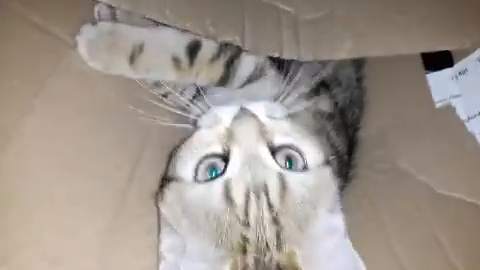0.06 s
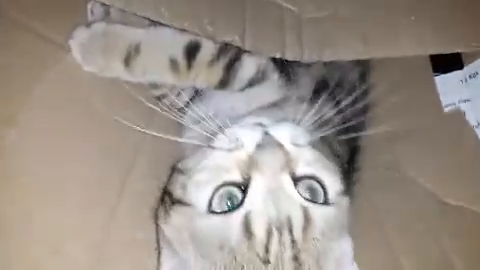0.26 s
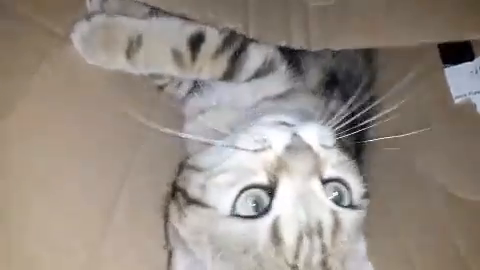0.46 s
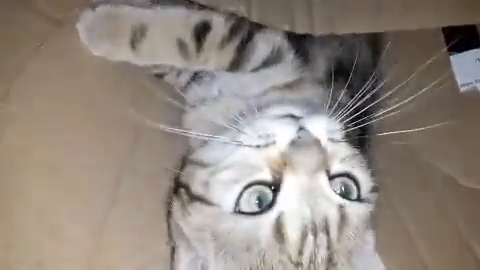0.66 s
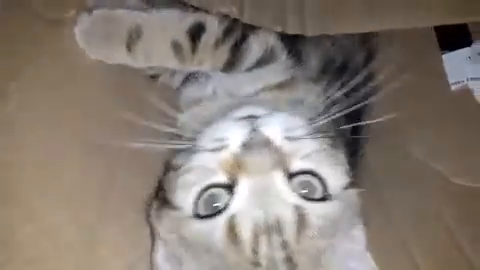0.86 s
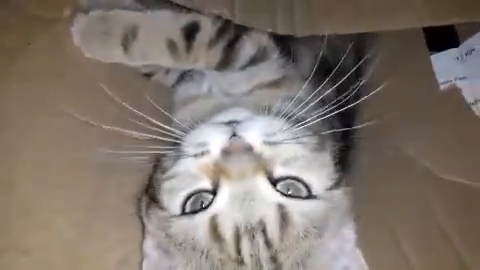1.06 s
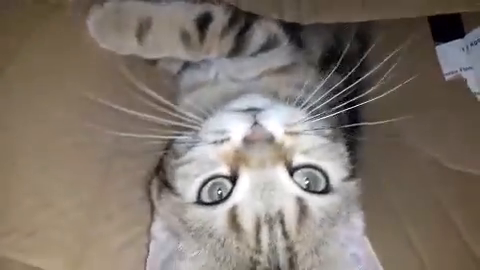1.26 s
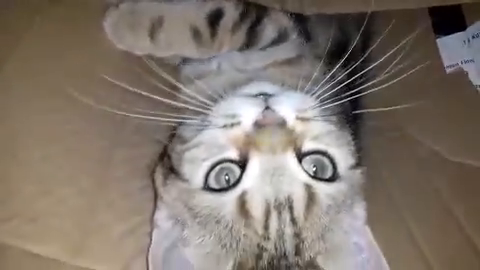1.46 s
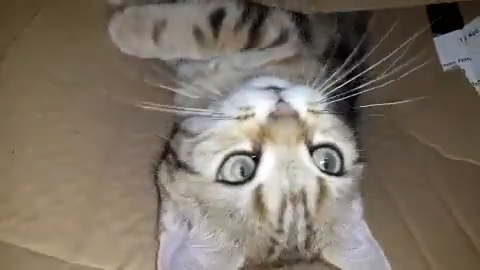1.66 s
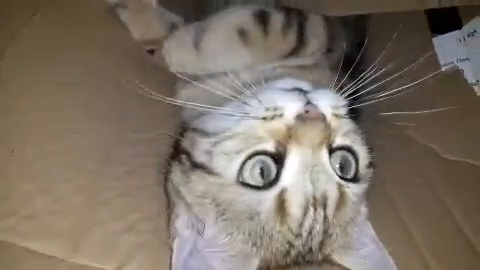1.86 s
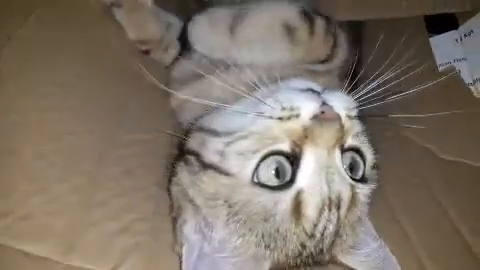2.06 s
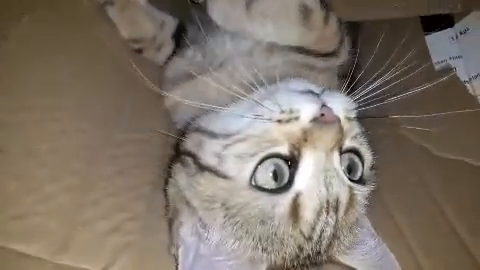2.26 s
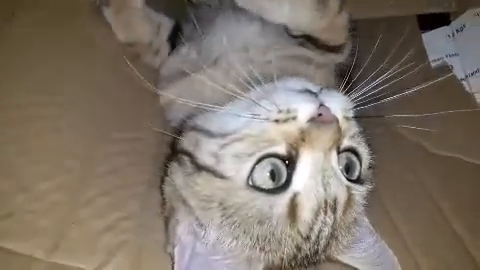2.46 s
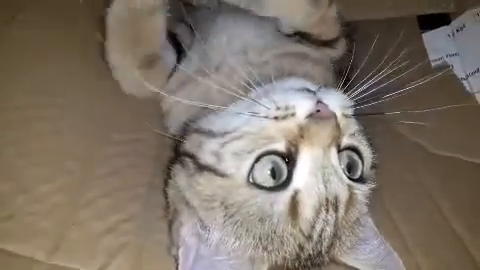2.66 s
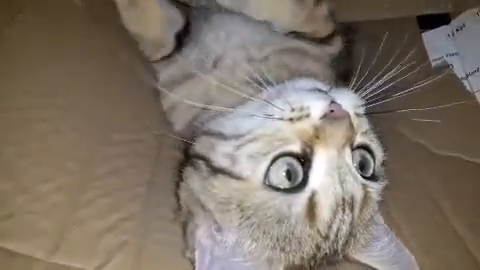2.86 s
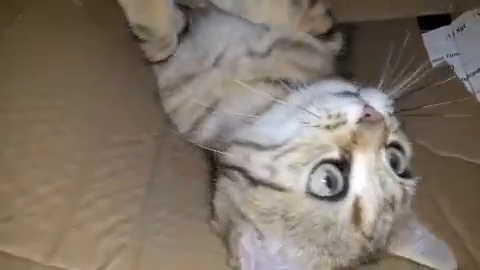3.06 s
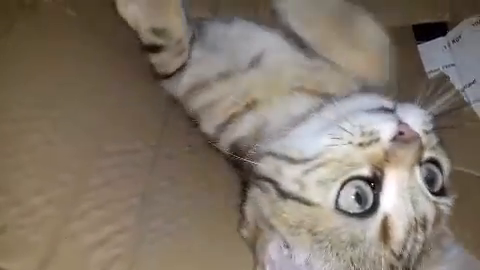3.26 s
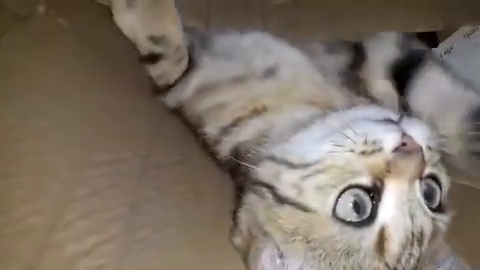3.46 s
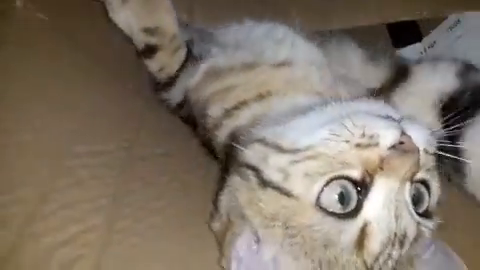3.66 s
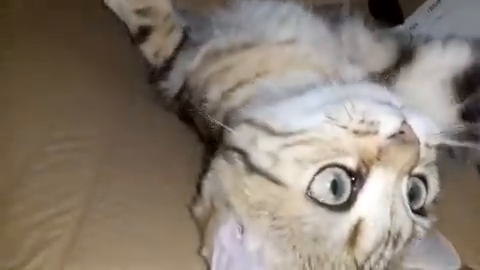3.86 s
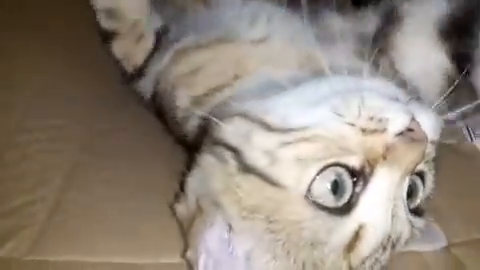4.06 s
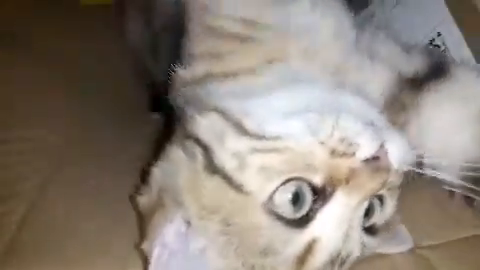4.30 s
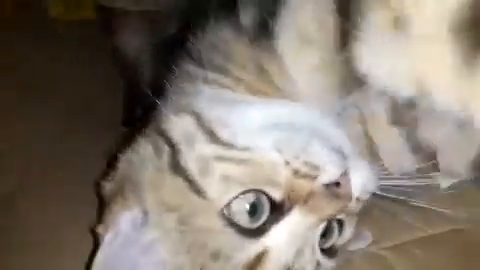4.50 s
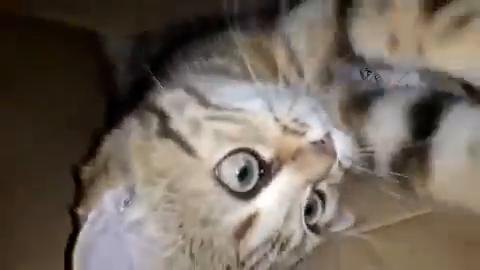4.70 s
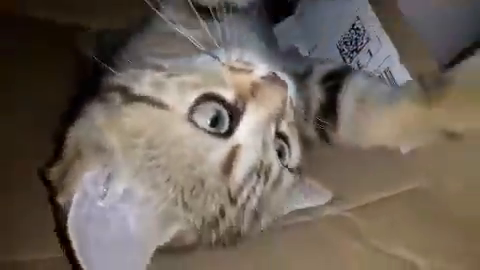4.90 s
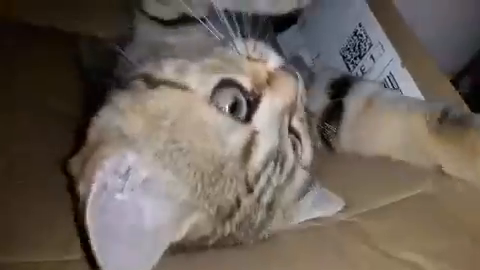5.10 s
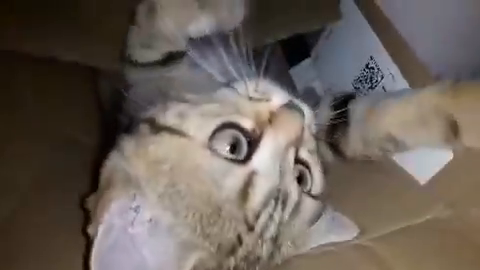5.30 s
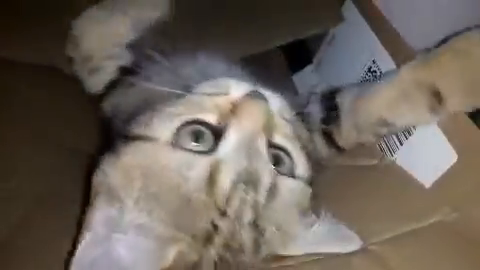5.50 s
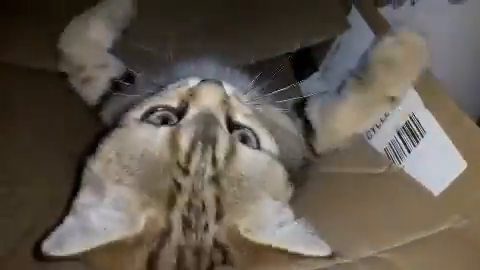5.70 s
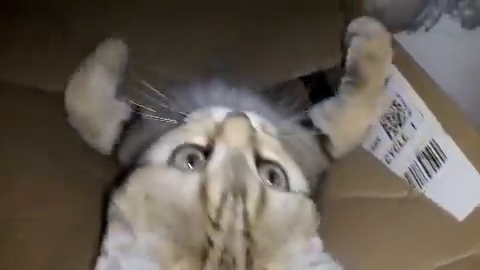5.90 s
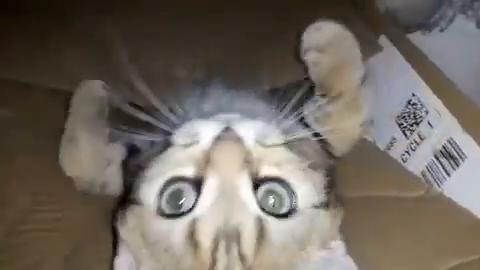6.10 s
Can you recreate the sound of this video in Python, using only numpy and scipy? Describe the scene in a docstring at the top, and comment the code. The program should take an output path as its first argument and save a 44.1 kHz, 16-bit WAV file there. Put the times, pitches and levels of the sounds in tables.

```python
"""A low rumble like far traffic, an engine in it, a faint appliance hum and hiss lie behind a quiet room.
From the start a kitten rolls about on its back in a cardboard box: its fur brushes the board (grains of noise),
claws tick in the paper liner (brief rings and crackle) and paws knock on the walls (ringing modes).
Midway a deep drone comes and goes and a claw rakes across the wall with falling pitch (a gliding resonance).
Later, soft weight lands on the floor of the box (low modes that sink in pitch)."""
import sys
import numpy as np
from scipy import signal
from scipy.fft import rfft, irfft, next_fast_len
from scipy.io import wavfile
from scipy.ndimage import uniform_filter1d, map_coordinates

SR = 44100
rng = np.random.default_rng(int(sys.argv[2]) if len(sys.argv) > 2 else 0)


def put_to_file(sound):
    """Save the sound as 16-bit audio at rate SR, in the file named by the first command-line argument."""
    columns = np.atleast_2d(sound).T  # one column per channel
    safe = np.clip(columns, -1, 1)
    whole_steps = np.round(safe * 32767)
    wavfile.write(sys.argv[1], SR, whole_steps.astype(np.int16))


N = 270950

# Colour of fur hissing on board and of fine fibres. Each row: frequency in Hz, relative level in dB per Hz.
FUR_COLOUR = [(1500, -37), (4000, -22), (6000, -5), (7500, -1.5), (11000, 4), (13500, -1.5), (16000, -12.5)]
# Colour of coarser slips on paper. Each row: frequency in Hz, relative level in dB per Hz.
RASP_COLOUR = [(1500, -21), (2700, -7.5), (3300, -1.5), (4200, -2), (5500, -2.5), (8000, -4.5),
               (15000, -45)]


def from_db(db):
    """Turn decibels into a gain."""
    return 10 ** (np.asarray(db) / 20)


def rms_one(x):
    """Scale a sound to an rms of 1."""
    return x / np.sqrt(np.mean(x ** 2) + 1e-20)


def in_time(rows):
    """Draw straight lines between the rows of a curve, giving each column at every sample."""
    s, *columns = np.transpose(rows)
    return [np.interp(np.arange(N) / SR, s, column) for column in columns]


def coloured(x, spectrum):
    """Filter a sustained sound to a given balance of low and high, at rms 1."""
    size = next_fast_len(N)
    hz, db = np.transpose(spectrum)
    f = np.maximum(np.fft.rfftfreq(size, 1 / SR), 1)
    # below the first point the level falls by a further 12 dB per octave
    below_db = 20 * np.log10(np.minimum(f / hz[0], 1) ** 2)
    gain = from_db(np.interp(np.log(f), np.log(hz), db) + below_db)
    return rms_one(irfft(rfft(x, size) * gain, size)[:N])


def drift(per_s):
    """Wander smoothly through random points, so many per second, with an rms of 1."""
    knots = rng.standard_normal(8192)
    return rms_one(map_coordinates(knots, [np.arange(N) * per_s / SR], order=3, mode="wrap"))


def grains(per_s, spread_db):
    """Make tiny slips at random moments, of uneven size and sign."""
    sizes = from_db(spread_db * np.minimum(rng.exponential(1, N), 4))
    signs = rng.choice([-1, 1], N)
    happens = rng.random(N) < per_s / SR
    return sizes * signs * happens


def clicks(times, db):
    """Place one impulse for each contact."""
    out = np.zeros(N)
    out[np.round(times * SR).astype(int)] = from_db(db)
    return out


def ring(x, hz, t60):
    """Let each unit click start a sine of height 1 that falls by 60 dB in t60 seconds."""
    r = from_db(-60 / (t60 * SR))
    w = 2 * np.pi * hz / SR
    return signal.lfilter([0, np.sin(w)], [1, -2 * r * np.cos(w), r * r], x + 1e-18)


def fading(x, t60):
    """Let each unit click start an envelope that falls by 60 dB in t60 seconds."""
    return signal.lfilter([1], [1, -from_db(-60 / (t60 * SR))], x + 1e-18)


def swell(start, attack, hold, release):
    """Rise to 1 at the start, hold, die away; attack and release are time constants in seconds."""
    age = np.arange(N) / SR - start
    rise = np.minimum(age, 0) / attack
    fall = np.maximum(age - hold, 0) / release
    return np.exp(np.maximum(rise - fall, -40))


def bump(s, spread):
    """Rise and fall in a smooth bell shape about a moment; both values in seconds."""
    return np.exp(-.5 * np.minimum(((np.arange(N) / SR - s) / spread) ** 2, 80))


def gliding(x, hz, width, size=128):
    """Filter through a resonance whose centre moves, block by block, at rms 1."""
    out, state = np.zeros(N), np.zeros(2)
    r = np.exp(-np.pi * width / SR)
    for i in range(0, N, size):
        poles = [1, -2 * r * np.cos(2 * np.pi * hz[i] / SR), r * r]
        out[i:i + size], state = signal.lfilter([1, 0, -1], poles, x[i:i + size], zi=state)
    return rms_one(out)


def tone(hz, db):
    """Make a sine of the given pitch and rms level."""
    phase = 2 * np.pi * np.cumsum(hz * np.ones(N)) / SR
    return np.sqrt(2) * from_db(db) * np.sin(phase)


def traffic(steady_db=-63, overtone_fade_db_per_s=18.5):
    """Rumbling noise swells as vehicles pass; one far engine, a sine with overtones, wavers in it."""
    # Vehicles passing. Each row: moment nearest in seconds, level in dB, spread of the bell shape in seconds.
    passes = [(.25, -64, 0.085), (2.16, -57, 0.11), (3.55, -63.5, 0.54)]
    # Colour of the rumble. Each row: frequency in Hz, relative level in dB per Hz.
    rumble_colour = [(25, -17), (55, -13.5), (85, -1.5), (115, 2), (160, -2.5), (220, -7.5), (300, -13.5),
                     (420, -23), (900, -39.5)]
    # An engine coasts, then pulls away. Each row: time in seconds, pitch in Hz and level in dB before wavering.
    engine = [(0, 96, -73), (.45, 91, -63), (.9, 80, -68.5), (1.15, 106, -61), (1.55, 115, -64.5),
              (2.2, 150, -65.5), (2.7, 155, -83)]
    # Engine overtones. Each row: multiple of the engine pitch, level in dB at the start before wavering.
    engine_overtones = [(1.52, -59), (2.018, -64)]
    power = from_db(steady_db) ** 2
    power = power + sum((from_db(db) * bump(s, spread)) ** 2 for s, db, spread in passes)
    rumble = np.sqrt(power) * coloured(rng.standard_normal(N), rumble_colour)
    engine_hz, engine_db = in_time(engine)
    engine_hz = engine_hz + 3 * drift(25)
    fade_db = overtone_fade_db_per_s * np.arange(N) / SR
    overtones = sum(tone(multiple * engine_hz, db - fade_db) for multiple, db in engine_overtones)
    waver = from_db(1.0 * drift(27))
    return rumble + (tone(engine_hz, engine_db) + overtones) * waver


def humming(centre_hz=270, rise_s=0.17):
    """An appliance hums as one slightly unsteady sine that comes up in steps."""
    # Steps of the hum, whose powers add. Each row: time in seconds, level added in dB.
    hum_steps = [(0, -83), (1.9, -72), (4.75, -65)]
    power = sum((from_db(db) * swell(s, rise_s, N / SR, rise_s)) ** 2 for s, db in hum_steps)
    return np.sqrt(power) * tone(centre_hz + 0.63 * drift(11), 0)


def droning(start_s=2.38, hold_s=1.45, fade_s=0.06, hz=40.8, level_db=-74):
    """A deep steady sine comes and goes."""
    return swell(start_s, fade_s, hold_s, fade_s) * tone(hz, level_db)


def background(hiss_db=-74.5):
    """Traffic, appliance hum, a deep drone and faint coloured noise add together."""
    # Colour of the hiss. Each row: frequency in Hz, relative level in dB per Hz.
    hiss_colour = [(300, -1.5), (1000, 2), (2000, -2.5), (6000, -12.5), (7300, -1.5), (8800, -24),
                   (11500, -9), (15000, -6)]
    hiss = from_db(hiss_db) * coloured(rng.standard_normal(N), hiss_colour)
    return traffic() + humming() + droning() + hiss


def shoving(settle_s=0.098):
    """Each shove of the body swells, holds and dies away; powers add to dB levels of fur, rasp and drag."""
    # Shoves along the board. Each row: time of full pressure, swell and hold in seconds,
    # then fur hiss, paper rasp and panel drag in dB before trim.
    shoves = [(0.037, 0.068, 0.38, -80, -77.5, -83), (0.642, .06, 0.046, -69.5, -70, -86),
              (1.3, 0.022, .03, -72.5, -82, -86), (1.495, 0.088, 0.051, -80, -88, -98),
              (1.783, 0.02, .05, -58, -68.5, -67.5), (1.918, 0.057, 0.16, -60, -79, -91),
              (2.216, 0.028, 0.029, -67.5, -78, -69), (2.4, 0.045, .03, -68.5, -84, -91),
              (2.595, 0.023, 0.018, -63, -69.5, -65.5), (2.743, 0.099, 0.22, -67, -71.5, -77),
              (3.079, 0.078, 0.065, -55, -58, -67.5), (3.233, 0.086, 0.29, -54, -60, -60),
              (3.56, 0.027, 0.018, -51.5, -71, -52.5), (3.657, .04, 0.08, -53, -80, -77),
              (3.786, 0.042, 0.036, -52, -57, -51), (3.93, 0.035, 0.052, -60.5, -59.5, -63),
              (4.14, 0.024, 0.041, -59.5, -65.5, -58.5), (4.375, 0.079, 0.14, -54.5, -55, -59),
              (4.649, 0.045, 0.019, -54.5, -55.5, -51), (4.876, 0.097, 0.096, -58.5, -62, -64),
              (5.138, 0.046, 0.031, -72, -66, -70.5), (5.325, 0.035, 0.14, -64.5, -62.5, -73),
              (5.582, 0.068, 0.11, -61.5, -64, -73.5), (5.993, 0.2, .14, -64, -69, -74)]
    # The body never lies quite still: fur hiss, paper rasp and panel drag at rest, in dB before trim.
    rest_db = (-84.5, -87.5, -98)
    power = from_db(rest_db)[:, None] ** 2
    for s, attack, hold, *levels_db in shoves:
        power = power + np.outer(from_db(levels_db), swell(s, attack, hold, settle_s)) ** 2
    return 10 * np.log10(power)


def sliding(grain_db=2.0):
    """Countless hairs hiss, coarser slips rasp on the paper, and the weight behind them shakes the panel."""
    # Colour of the shaken panel. Each row: frequency in Hz, relative level in dB per Hz.
    drag_colour = [(80, -21), (200, -5), (330, -2.5), (460, -8), (560, -5), (660, -2.5), (850, -8.5),
                   (1050, -8), (1400, -12), (1900, -13.5), (2400, -14), (4000, -23)]
    fur_db, rasp_db, drag_db = shoving()
    pressure_db = 0.22 * drift(45)
    fur = from_db(fur_db - 0.34) * coloured(grains(per_s=20000, spread_db=4.5), FUR_COLOUR)
    rasp = from_db(rasp_db - 0.25) * coloured(grains(per_s=6000, spread_db=grain_db), RASP_COLOUR)
    drag = from_db(drag_db + 2.0) * coloured(grains(per_s=1800, spread_db=grain_db), drag_colour)
    return (fur + rasp + drag) * from_db(pressure_db)


def ticking(ring_db=-8, fibre_db=-10, paper_db=-12, release_s=0.00074):
    """A claw tip snaps free: the liner rings for a moment and fibres crackle, duller the deeper it sat."""
    # Claw ticks. Each row: time in seconds, strength in dB before trim, low ring against high in dB.
    ticks = [(0.093, -50, 9), (0.2629, -45, -2), (0.3, -45, 3), (.544, -45, 7), (2.1056, -43, -7),
             (2.1179, -37.5, -10.5), (2.175, -43.5, -14), (2.1967, -41.5, -10), (2.212, -38.5, -8),
             (2.216, -47, -7), (2.241, -40, -6), (2.2488, -47, -9), (2.261, -40.5, -7),
             (2.2962, -40.5, -11), (2.3377, -39.5, -12), (2.838, -50, -13), (2.894, -40, -4),
             (3.422, -32.5, -5), (3.8499, -21, 0.5), (4.1808, -44.5, -6), (4.761, -37, 5),
             (6.084, -41.5, 1)]
    # Paper liner under a claw. Each row: frequency in Hz, relative level in dB, time to fall 60 dB in seconds.
    liner_modes = [(911, -21.5, 0.1), (2840, -13, 0.01), (3462, -10.5, 0.028), (4400, -33, 0.0029),
                   (7100, 4, 0.00099), (8600, 3, 0.0017), (10100, -6, 0.0058), (13100, -35, 0.0012)]
    s, strength_db, low_db = np.transpose(ticks)
    out = np.zeros(N)
    for k, (hz, db, t60) in enumerate(liner_modes):
        lowness = np.interp(hz, [3400, 11000], [.5, -.5])
        hit = clicks(s, strength_db + ring_db + db + lowness * low_db)
        out += (-1) ** k * ring(hit, hz, t60)
    for colour, db in ((FUR_COLOUR, fibre_db - low_db / 2), (RASP_COLOUR, paper_db + low_db / 2)):
        envelope = fading(clicks(s, strength_db + db), t60=0.013)
        # averaging over a short window softens the onset
        tearing = uniform_filter1d(envelope, 1 + int(2 * release_s * SR))
        out += tearing * coloured(rng.standard_normal(N), colour)
    return out


def knocking(belly_trim_db=0, panel_trim_db=-6, edge_trim_db=2, spot_db=7, spot_octaves=0.29,
             snap_db=13, crackle_db=2, snap_hz=3600):
    """Paws set the belly, panels and edges of the box ringing, with a snap and a brief crackle."""
    # Paws on the walls. Each row: time in seconds, then panel, belly, edge and crack strengths in dB
    # before trim, and the frequency in Hz that the struck spot favours.
    knocks = [(0.594, -54.5, -68, -41.5, -57.5, 710), (0.653, -38, -82, -35, -55.5, 580),
              (1.777, -41, -50.5, -33, -49.5, 600), (2.554, -43.5, -54.5, -44, -54, 650),
              (2.603, -45.5, -68, -45, -50, 1060), (2.863, -57, -64, -66, -79, 579),
              (3.568, -39.5, -66, -63, -70, 650), (4.127, -46, -57, -62, -71.5, 746),
              (4.483, -27.5, -34, -37, -37, 560), (4.596, -52, -50, -56, -52, 654),
              (4.761, -51, -64, -42, -59, 1220), (5.318, -59, -47.5, -59, -54.5, 440),
              (5.343, -53, -50, -76, -65, 463), (5.807, -55, -60, -62, -75.5, 654),
              (5.999, -44.5, -72, -75, -59, 650), (6.043, -57, -50, -67, -62, 565),
              (6.113, -47, -82, -66, -62, 674)]
    # Box walls. Each row: frequency in Hz, relative level in dB, time to fall 60 dB in seconds.
    box_modes = [(154.5, 8, 0.029), (260, -1, 0.065), (347, 5.5, 0.015), (570, 7, 0.016), (726, 2.5, 0.029),
                 (870, 3.5, 0.014), (1080, -7.5, 0.017), (1446, 0, 0.0073), (1560, 0, 0.0095),
                 (1870, -18, 0.028), (2150, -19, 0.027)]
    # Colour of the crackle. Each row: frequency in Hz, relative level in dB per Hz.
    crack_colour = [(1000, -0.5), (2500, -5), (4500, -9.5), (7000, -10.5), (11000, -20), (16000, -46)]
    s, panel_db, belly_db, edge_db, crack_db, spot_hz = np.transpose(knocks)
    strengths = np.transpose([belly_db + belly_trim_db, panel_db + panel_trim_db, edge_db + edge_trim_db])
    out = np.zeros(N)
    for k, (hz, db, t60) in enumerate(box_modes):
        # belly, panel and edge strengths apply at these three pitches and blend in between
        blow_db = np.array([np.interp(np.log(hz), np.log([230, 620, 1400]), row) for row in strengths])
        favour_db = spot_db * np.exp(-(np.log2(hz / spot_hz) / spot_octaves) ** 2)
        out += (-1) ** k * ring(clicks(s, blow_db + db + favour_db), hz, t60)
    snap = ring(clicks(s, crack_db + snap_db), snap_hz, t60=0.00066)
    crackle_envelope = fading(clicks(s, crack_db + crackle_db), t60=0.027)
    crackle = crackle_envelope * coloured(rng.standard_normal(N), crack_colour)
    return out + snap + crackle


def raking(start_s=3.25, end_s=3.388, rake_db=-44, snag_s=0.0036, ring_start_s=3.297, ring_db=-40,
           ring_hz=2520, fall_octaves_per_s=11.8, ring_width_hz=720, catch_q=4.6):
    """A claw tears paper fibres in dense slips; the patch under it rings lower as it nears mid-wall."""
    # A claw or pad catches and one patch of board sings. Each row: middle in seconds, level in dB,
    # spread of the bell shape in seconds, pitch in Hz.
    catches = [(2.893, -61, 0.017, 1010), (3.153, -55.5, 0.067, 670), (3.279, -43.5, 0.015, 594),
               (3.593, -51, 0.025, 645), (3.75, -56.5, 0.14, 2880), (4.19, -54.5, 0.025, 666),
               (4.363, -56, 0.019, 610), (4.507, -49.5, .012, 4560), (4.668, -48.5, 0.013, 2230),
               (4.683, -45.5, 0.016, 690), (6.051, -61.5, .036, 640)]
    # The raking claw snags on ribs under the paper. Each row: time in seconds, level in dB.
    snags = [(3.274, -36), (3.2974, -31.5), (3.321, -31.5), (3.344, -34.5), (3.386, -37)]
    # Colour of a snag. Each row: frequency in Hz, relative level in dB per Hz.
    snag_colour = [(500, -21), (1500, -3), (2800, -1), (4200, -0.5), (7000, -5), (11000, -5.5),
                   (16000, -18)]
    # Colour of claw slips. Each row: frequency in Hz, relative level in dB per Hz.
    claw_colour = [(150, -11), (400, -4.5), (700, -4), (1100, 0.5), (1600, -6), (2450, -2.5), (3800, -2.5),
                   (5000, -6), (7000, -6.5), (11000, -4), (16000, -11.5)]
    t = np.arange(N) / SR
    force = from_db(rake_db) * swell(start_s, attack=0.012, hold=end_s - start_s, release=0.0032)
    out = force * coloured(grains(per_s=7000, spread_db=-0.5), claw_colour)
    jerks = sum(from_db(db) * np.exp(-np.abs(t - s) / snag_s) for s, db in snags)
    out += jerks * coloured(grains(per_s=20000, spread_db=3.5), snag_colour)
    slips = coloured(grains(per_s=9000, spread_db=1.7), claw_colour)
    travel_s = np.clip(t, ring_start_s, end_s) - ring_start_s
    falling_hz = ring_hz * 2 ** (-fall_octaves_per_s * travel_s)
    wall = gliding(slips, falling_hz, ring_width_hz)
    out += from_db(ring_db) * swell(ring_start_s, attack=0.0061, hold=0.064, release=0.021) * wall
    for s, db, spread, hz in catches:
        patch = signal.lfilter(*signal.iirpeak(hz, catch_q, fs=SR), slips)
        out += from_db(db) * bump(s, spread) * rms_one(patch)
    return out


def thudding(sag=0.45, sag_s=0.0064):
    """A furry weight presses on smoothly; as it loads the floor, the pitch of its modes sinks."""
    # Soft landings. Each row: time in seconds, level in dB, time constant of the contact in seconds.
    thuds = [(4.664, -15.5, 0.0016), (5.146, -40.5, 0.0044), (6.004, -31.5, 0.0055)]
    # Floor of the box. Each row: settled frequency in Hz, relative level in dB, time to fall 60 dB in seconds.
    floor_modes = [(107.4, -10.5, 0.078), (148, -0.5, 0.061), (223, -16, 0.04), (305, -7, 0.037),
                   (406, -13.5, 0.042), (657, -29.5, 0.065)]
    out = np.zeros(N)
    for s, db, contact in thuds:
        age = np.maximum(np.arange(N) / SR - s, 0)
        push = from_db(db) * (1 - np.exp(-(age / contact) ** 2))
        # this clock runs fast at first, so each pitch starts high and settles
        clock = age + sag * sag_s * (1 - np.exp(-age / sag_s))
        for hz, mode_db, t60 in floor_modes:
            decay = from_db(mode_db) * np.exp(-np.log(1000) * age / t60)
            out -= push * decay * np.sin(2 * np.pi * hz * clock)
    return out


def open_box(x, leak_hz=105):
    """Air flows round the open flaps, so the deepest bass cancels."""
    return signal.sosfilt(signal.butter(2, leak_hz, "high", fs=SR, output="sos"), x)


def reflections(x, t60, low_hz, high_hz):
    """Dense echoes start 3 ms after the sound and fade, with lows and highs softened."""
    t = np.arange(SR // 2) / SR
    tail = rng.standard_normal(len(t)) * from_db(-60 * t / t60) * (t > .003)
    walls = signal.butter(1, [low_hz, min(high_hz, .45 * SR)], "band", fs=SR, output="sos")
    echoes = signal.sosfilt(walls, tail / np.linalg.norm(tail))
    return signal.fftconvolve(x, echoes)[:N]


def scene():
    """Contacts echo inside the box and in the room; the channels differ only by a trace of hiss."""
    blows = open_box(knocking() + thudding()) + ticking()
    rubbing = sliding() + raking()
    box = from_db(-8) * reflections(blows, t60=0.06, low_hz=620, high_hz=9400)
    room = from_db(-7.5) * reflections(blows + .5 * rubbing, t60=0.29, low_hz=400, high_hz=13900)
    channel_hiss = from_db(-80.5) * rng.standard_normal((2, N))
    return blows + rubbing + box + room + background() + channel_hiss


def record(dry, cutoff_hz=16000):
    """The microphone port colours the treble; a steep filter cuts the top."""
    # Resonances of the microphone port. Each row: frequency in Hz, width in Hz, gain at the centre in dB.
    port = [(7680, 1120, 8.5), (8980, 4250, -9)]
    out = dry
    for hz, width, db in port:
        band = signal.lfilter(*signal.iirpeak(hz, hz / width, fs=SR), out)
        out = out + (from_db(db) - 1) * band
    return signal.sosfilt(signal.ellip(12, .1, 70, cutoff_hz, fs=SR, output="sos"), out)


dry = scene()
out = record(dry)
put_to_file(out)
```